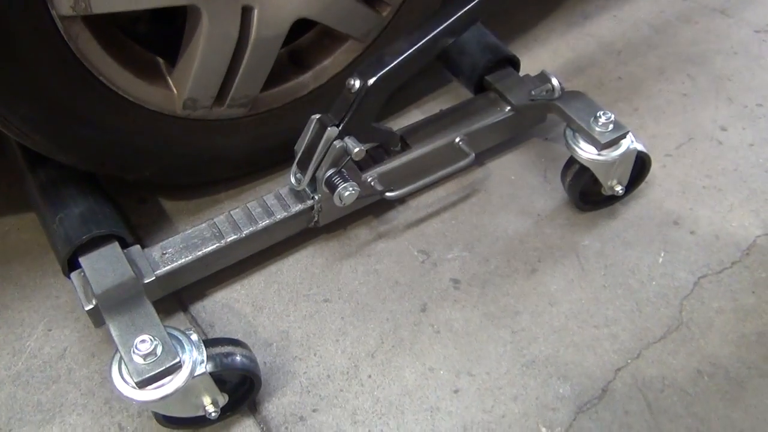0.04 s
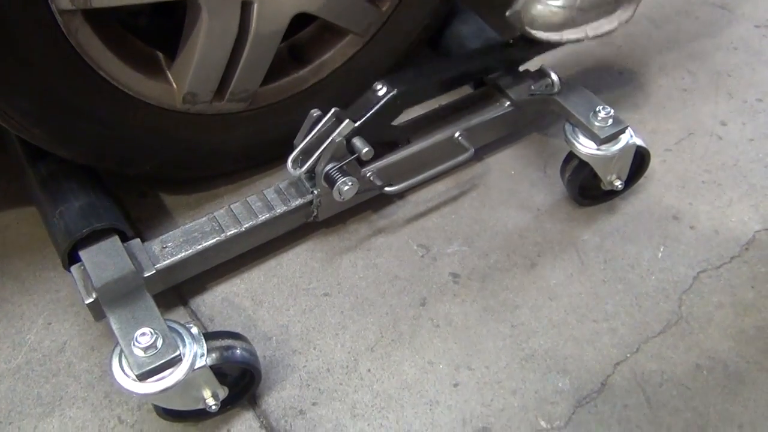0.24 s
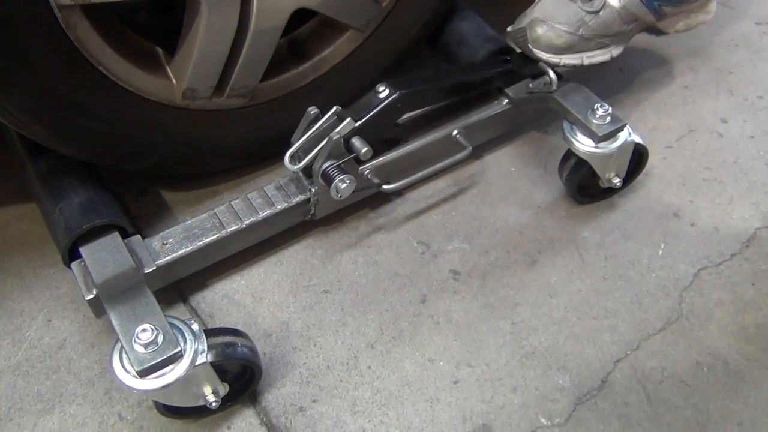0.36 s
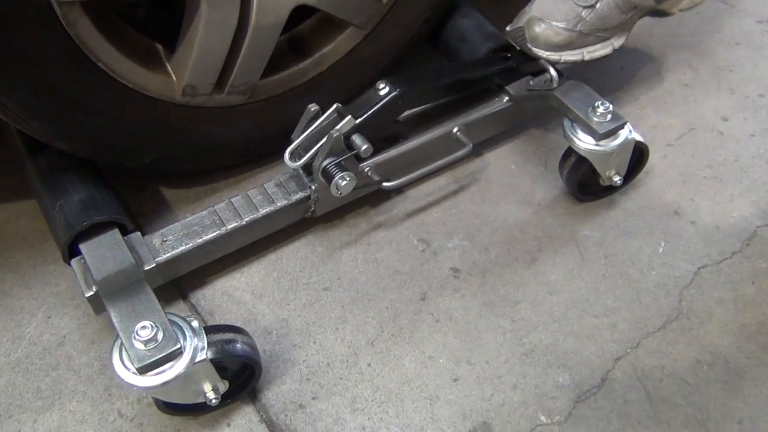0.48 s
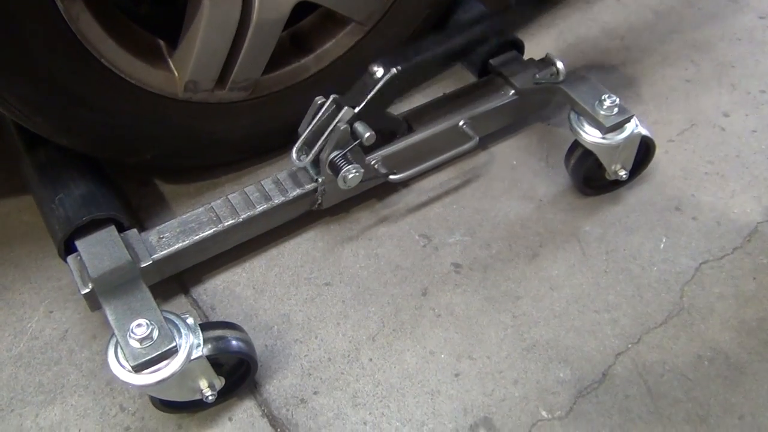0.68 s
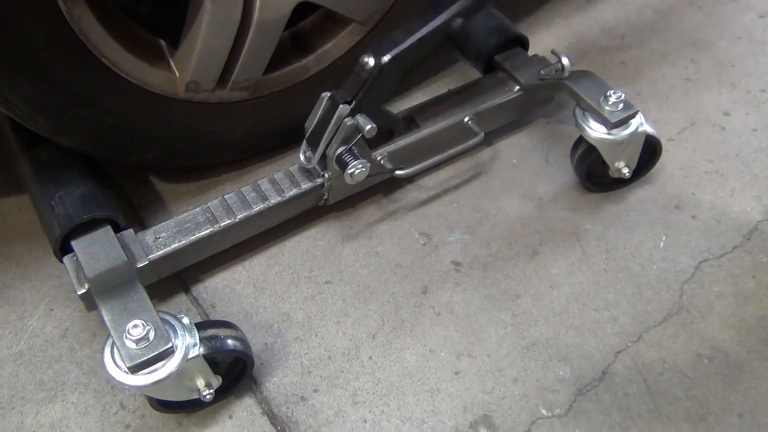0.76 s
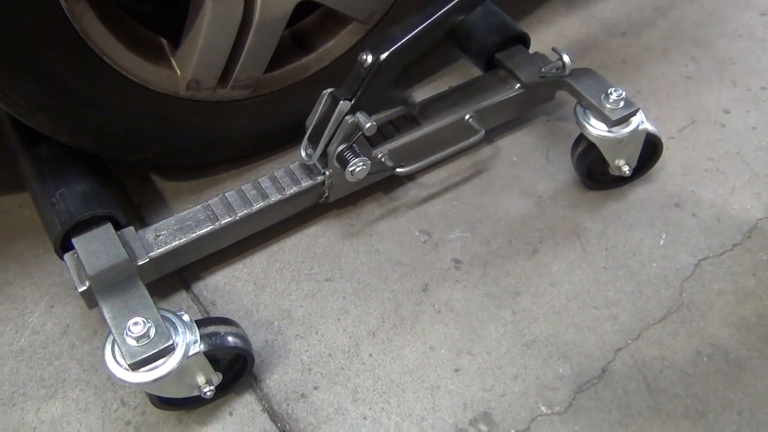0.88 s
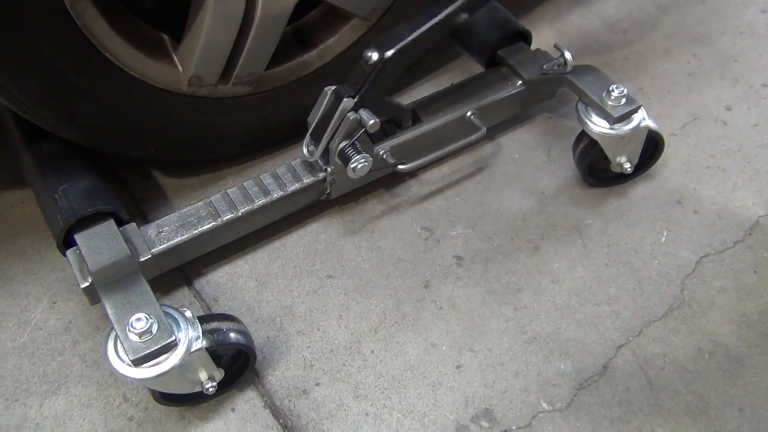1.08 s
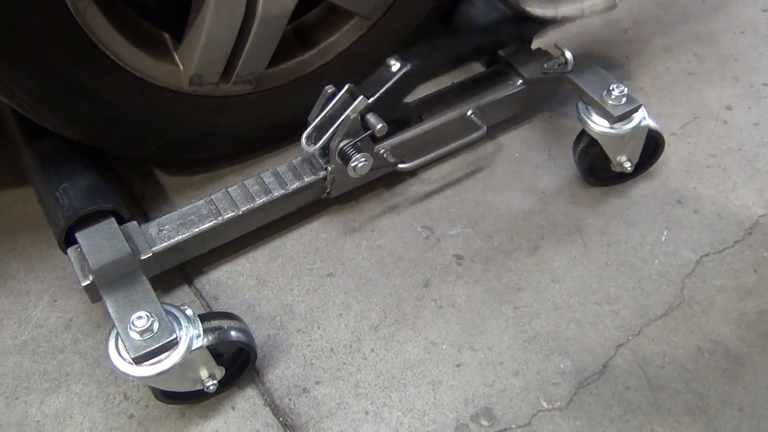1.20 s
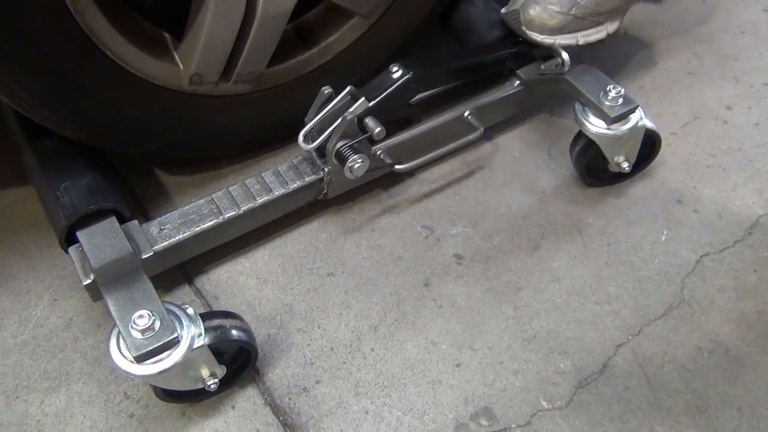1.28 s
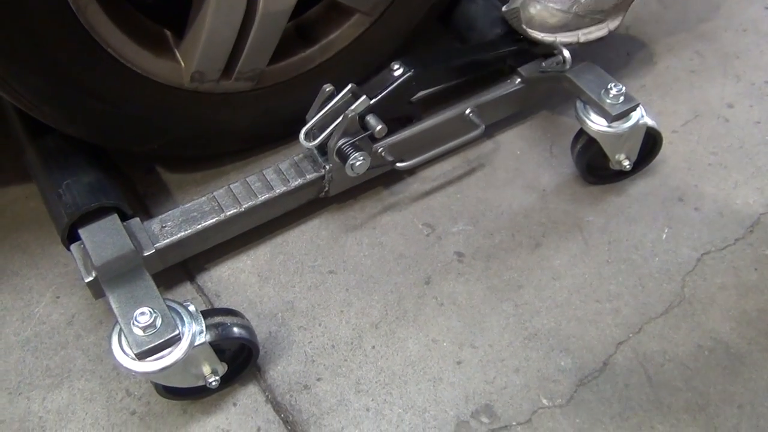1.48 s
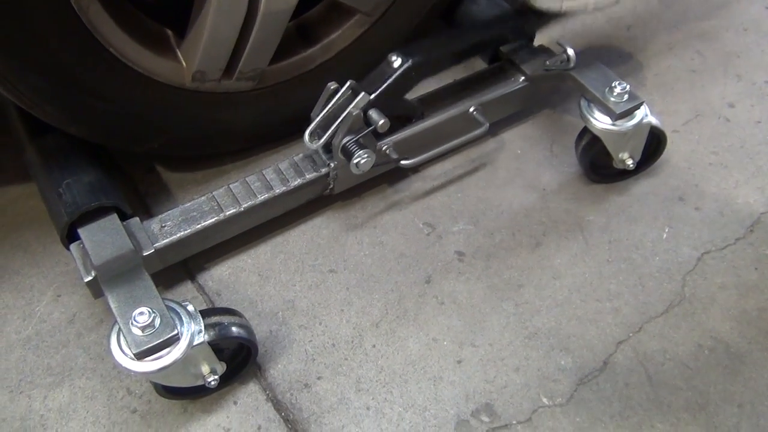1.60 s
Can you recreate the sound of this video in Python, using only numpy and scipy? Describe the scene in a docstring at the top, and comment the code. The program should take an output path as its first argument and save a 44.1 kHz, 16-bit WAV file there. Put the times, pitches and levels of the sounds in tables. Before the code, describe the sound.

A steel jack is pumped by foot, close by in a concrete garage. Soft, dull knocks lead into a bright, ringing pedal clank at about 0.3 seconds. From 0.7 to 1.0 seconds a quick, uneven run of ratchet clicks follows as the pedal springs back. More knocks bring a second clank around 1.25 seconds, then faint taps near 1.6. Each blow echoes briefly over low room noise.

```python
"""Dull knocks, bright steel clanks and a run of ratchet clicks ring out close by in a concrete garage.
A steel positioning jack is being pumped by foot: the shoe knocks on the pedal, the pedal clanks down,
and on its way back the pawl (a small catch) clicks over the toothed bar.
The garage rings after each blow, and a fast limiter holds the loudest ones down."""
import sys
import numpy as np
from scipy import signal
from scipy.fft import rfft, irfft
from scipy.io import wavfile
from scipy.ndimage import uniform_filter1d, minimum_filter1d

SR = 44100
rng = np.random.default_rng(int(sys.argv[2]) if len(sys.argv) > 2 else 0)


def store_pcm(level_fs):
    """Save levels as 16-bit WAV."""
    pcm = np.round(np.clip(level_fs, -1, 1) * 32767).astype(np.int16)
    wavfile.write(sys.argv[1], SR, np.atleast_2d(pcm).T)


N = 72765
LEAD_S = .2  # the jack starts this early, so it is already ringing at time 0
RISE_S = 0.001501  # build-up at 1 kHz; low bending waves in steel arrive later
THIRDS_HZ = 1000 * 2 ** (np.arange(-13, 13) / 3)  # band centres, a third of an octave apart


def amp(db):
    """Turns decibels into a gain."""
    return 10 ** (np.asarray(db) / 20)


def fade(t, t60):
    """A dying gain; t60, the fade time, is how long it takes to drop 60 dB."""
    return amp(-60 * t / t60)


def read(points, hz):
    """Looks up a table's value at hz, on a log-frequency axis."""
    f, value = np.transpose(points)
    return np.interp(np.log(hz + 1), np.log(f), value)


def unit(x):
    """Scales each row to energy 1."""
    return x / np.sqrt(np.sum(x ** 2, -1, keepdims=True) + 1e-30)


def add(mix, s, sound):
    """Mixes a sound in at time s; the mix starts LEAD_S early."""
    part = mix[max(round((s + LEAD_S) * SR), 0):][:len(sound)]
    part += sound[:len(part)]


def noise_bands(size):
    """White noise split into bands, one per row."""
    hz, band = np.fft.rfftfreq(size, 1 / SR), np.arange(len(THIRDS_HZ))
    place = np.interp(np.log(hz + 1), np.log(THIRDS_HZ), band)
    share = np.sqrt(np.maximum(1 - abs(place - band[:, None]), 0))
    return irfft(share * np.exp(2j * np.pi * rng.random(share.shape)), size)


def modes(table, wobble_hz=0, size=24000):
    """A part's natural tones (modes), one fading sine per row; a loose part wobbles in pitch."""
    hz, db, t60 = np.transpose(table)[:, :, None]
    t = np.arange(size) / SR
    wobble = np.cumsum(rng.standard_normal((len(hz), size)), 1) * np.sqrt(2 * np.pi * wobble_hz / SR)
    onset = 1 - np.exp(-t * (hz / 1000) / RISE_S)
    phase = 2 * np.pi * (hz * t + rng.random(hz.shape)) + wobble
    return np.sqrt(2) * amp(db) * onset * fade(t, t60) * np.sin(phase)


def background(level_db=-52):
    """Low, steady room noise."""
    # Tone of the noise: (frequency [Hz], level [dB])
    colour = [(25, -30.5), (60, -7.5), (130, -5), (280, -4.5), (420, -16), (650, -9.5), (1200, -18.5),
              (3000, -19.5), (8000, -27), (16000, -34.5)]
    hz = np.fft.rfftfreq(N, 1 / SR)
    noise = irfft(rfft(rng.standard_normal(N)) * amp(read(colour, hz)), N)
    return amp(level_db) * np.sqrt(N) * unit(noise)


def garage(x, build_s=0.002021, size=32768):
    """The room's echoes blur into a tail, each band dying at its own speed."""
    # How long the room rings, with no tail below 150 Hz: (frequency [Hz], fade time [s])
    fade_times = [(150, -0.013), (500, 0.6811), (1500, 0.5611), (4000, 0.6557), (8000, 0.6565),
                  (15000, 0.001)]
    # How strongly it rings: (frequency [Hz], level [dB])
    levels = [(100, 2.5), (400, -16), (1500, -10.5), (4000, -14.5), (8000, -19), (15000, -11)]
    t, bands = np.arange(size) / SR, noise_bands(size)
    tails = unit(bands * (1 - np.exp(-t / build_s)) * fade(t, read(fade_times, THIRDS_HZ)[:, None]))
    gains = amp(read(levels, THIRDS_HZ)) * np.linalg.norm(bands, axis=1)
    return signal.fftconvolve(x, gains @ tails)[:len(x)]


def clink(burst, ripple_db=4.5, spacing_hz=300, size=1024):
    """Each contact point has its own short resonances: random peaks in the treble."""
    hz, knots = abs(np.fft.fftfreq(size, 1 / SR)), np.arange(0, SR / 2, spacing_hz)
    depth = np.clip(hz / 1000 - 1, 0, 1)  # none below 1 kHz, full from 2 kHz
    ripple = np.clip(rng.standard_normal(len(knots)), -2, 2)
    gain = amp(ripple_db * depth * np.interp(hz, knots, ripple))
    log_gain = np.log(gain) - depth * np.log(np.mean(gain ** 2)) / 2
    taps = np.fft.ifft(np.exp(np.conj(signal.hilbert(log_gain)))).real  # rings only after the hit
    return signal.fftconvolve(burst, taps)[:len(burst)]


def blow(levels_db, t60, size=6000):
    """A hit on steel: a noise burst that dies fast, treble first, plus the frame's short tones."""
    # Centres of the bass, middle, treble and top levels [Hz]
    centres_hz = [500, 1600, 4200, 10000]
    # Tone shared by all bursts: (frequency [Hz], level [dB])
    colour = [(40, -41), (130, -35.5), (260, -4), (370, -12.5), (560, 2), (800, -5), (1300, -6), (2300, 0),
              (7500, 0), (11000, -4), (14000, -5), (17500, -24)]
    # Tones of the frame: (pitch [Hz], level [dB], fade time [s])
    frame = [(133.15, -4.5, 0.07942), (282.67, -5.5, 0.09138), (421.11, -5.5, 0.03941),
             (583.06, -2.5, 0.07996), (843.7, -7.5, 0.07181), (1183.3, -0.5, 0.04261),
             (1712.6, -10, 0.04384), (2223, -35.5, 0.014), (3171.1, 1, 0.03065), (5095.4, -3, 0.03109)]
    t, khz = np.arange(size) / SR, THIRDS_HZ[:, None] / 1000
    onset = (1 - np.exp(-t * khz / RISE_S)) ** 2
    decay = fade(t, t60 * (khz / 2) ** -0.1776)  # t60 holds at 2 kHz; lower bands last longer
    bands = unit(noise_bands(size) * onset * decay) * np.sqrt(.005 * SR)
    force = list(zip(centres_hz, levels_db))
    burst = amp(read(force, THIRDS_HZ) + read(colour, THIRDS_HZ)) @ bands
    return clink(burst) + amp(read(force, np.array(frame)[:, 0])) @ modes(frame, size=size)


def ringing(table, wobble_hz, favoured_hz, size=16384):
    """A struck steel part: clear tones over a shimmer; where it is hit decides which are strongest."""
    # The many weak tones between the clear ones: (frequency [Hz], level [dB])
    weak_tones = [(200, -45.5), (900, -19), (1800, -25), (3000, -4), (4000, -10), (7000, -4), (10000, -19),
                  (16000, -15)]
    t = np.arange(size) / SR
    octaves_away = abs(np.log2(np.array(table)[:, 0] / favoured_hz))
    favour_db = 8 * np.exp(-(octaves_away / .06) ** 2) - 6 * np.minimum(octaves_away, 1)
    shimmer = amp(read(weak_tones, THIRDS_HZ)) @ unit(noise_bands(size)) * np.sqrt(size)
    shimmer *= (1 - np.exp(-t / 0.001917)) * fade(t, t60=0.32253)
    return amp(favour_db) @ modes(table, wobble_hz, size) + shimmer


def knocks(mix):
    """The shoe and the linkage knock dully, each time with a hollow ring."""
    # Knocks: (time [s], bass [dB], middle [dB], treble [dB], top [dB], fade time [s],
    # ring level [dB], ring pitch [Hz])
    hits = [(0.101, -44, -50, -78.5, -81, 0.0632, -38.5, 910.5),
            (0.1509, -46, -27.5, -40, -51, 0.03237, -31.5, 1180),
            (.163, -48, -52.5, -40.5, -38.5, 0.07042, -46.5, 4940),
            (.302, -23.5, -26, -34.5, -26.5, .023, -7, 585.2),
            (1.0748, -36.5, -54, -80.5, -75.5, 0.02608, -36, 853.7),
            (1.083, -53.5, -52, -82, -80, 0.0179, -31.5, 649),
            (1.1209, -48.5, -30, -44.5, -60, 0.04023, -27, 1205),
            (1.1342, -51, -42, -35.5, -47, 0.0495, -32.5, 2783),
            (1.2784, -28, -28, -36.5, -26.5, 0.02513, -28.5, 619.3),
            (1.2858, -30, -55.5, -52, -51, 0.02844, -22.5, 551.9),
            (1.568, -45, -52.5, -54.5, -52.5, 0.0567, -37, 1113),
            (1.577, -46.5, -48.5, -54.5, -47.5, 0.07645, -39.5, 1420),
            (1.622, -44, -47, -55.5, -46.5, 0.0844, -32.5, 1037)]
    # Tones of the hollow ring: (pitch [times the ring pitch], level [dB], fade time [s])
    hollow = [(1, 3, 0.03449), (0.901, -7, 0.034245), (.76, -3.5, 0.043025)]
    for s, *levels_db, t60, ring_db, ring_hz in hits:
        add(mix, s, blow(levels_db, t60))
        add(mix, s, amp(ring_db) * modes(np.array(hollow) * [ring_hz, 1, 1]).sum(0))


def load_thumps(mix):
    """The load thuds onto the floor, the pawl catches it and the jack's body booms."""
    # The load shifts onto the floor: (time [s], level [dB])
    thuds = [(.244, -37.5), (.404, -43.5), (.969, -44)]
    # The pawl catches a tooth: (time [s], level [dB])
    catches = [(.244, -46), (.787, -30), (1.2162, -20)]
    # The jack's body booms after a heavy blow: (time [s], level [dB])
    booms = [(.303, -45), (.79, -45), (1.281, -45)]
    # Tones of the loaded bar, the body and the thud: (pitch [Hz], level [dB], fade time [s])
    loaded_bar = [(274.48, -1.5, 0.07162), (519.48, -1, 0.06511), (830.36, 1, 0.04616),
                  (1186.1, -2.5, 0.03421), (1591.9, 0.5, 0.05082), (1739.8, 1.5, 0.04675),
                  (2143.5, 1, 0.03666), (3060.8, 3, 0.04428), (3893.5, 3, 0.03476)]
    body = [(266.15, -6.5, 0.3858), (314.66, -3, 0.436), (421.02, -1.5, 0.2216), (585.56, -2.5, 0.2359)]
    thud_tone = [(55, 0, .16)]
    for hits, tones in ((thuds, thud_tone), (catches, loaded_bar), (booms, body)):
        for s, db in hits:
            add(mix, s, amp(db) * modes(tones).sum(0))


def scrapes(mix, slips_per_s=900, scatter_db=4, size=4096):
    """The pawl scrapes over the back of a tooth in a quick run of tiny, uneven slips."""
    # Scrapes: (time [s], length [s], level [dB])
    runs = [(.805, .036, -30.5), (0.926, .01, -23), (.936, 0.022, -31.5), (1.2506, .007, -35)]
    # Force of one slip: (bass [dB], middle [dB], treble [dB], top [dB])
    slip_db = [-28, -9, -2, 0]
    for s, length, db in runs:
        at = np.cumsum(rng.uniform(0, 2, size)) / slips_per_s
        force = amp(scatter_db * rng.standard_normal(size))
        slips = np.bincount((at[at < length] * SR).astype(int), force[at < length], size)
        scrape = signal.fftconvolve(slips, blow(slip_db, t60=.005, size=1024))
        add(mix, s, amp(db) * unit(scrape) * np.sqrt(length * SR))


def strike(mix, t, hits, tones, wobble_hz, choke_db=-1.5, choke_s=0.001846):
    """Adds blows to the mix and returns the part's ring; each contact chokes the earlier ringing a bit."""
    ring = np.zeros(len(t))
    for s, *levels_db, t60, ring_db, favoured_hz in hits:
        add(mix, s, blow(levels_db, t60))
        ring *= amp(choke_db * np.clip((t - s) / choke_s, 0, 1))
        add(ring, s, amp(ring_db) * ringing(tones, wobble_hz, favoured_hz))
    return ring


def pedal_clanks(mix, t):
    """The loose pedal lever clanks and rings as it is pressed down."""
    # Clanks: (time [s], bass [dB], middle [dB], treble [dB], top [dB], fade time [s],
    # ring level [dB], favoured pitch [Hz])
    clanks = [(-.13, -34, -20.5, -16, -12, 0.016165, -35, 8010),
              (.244, -60, -16, -22, -35, .027, -46, 2640),
              (.248, -30.5, -39, -28, -21, 0.01652, -36.5, 12230),
              (.278, -50, -40, -27, -20, 0.0406, -30.5, 2756),
              (.2912, -54, -18, -18.5, -14, 0.04826, -26, 7787),
              (.318, -38, -38, -42, -31, 0.02127, -33, 5150),
              (.344, -44, -41.5, -41, -34, 0.1079, -38.5, 12600),
              (1.2158, -33.5, -19.5, -19.5, -18.5, 0.03674, -56.5, 3191),
              (1.251, -45.5, -46.5, -26.5, -15.5, 0.0324, -33.5, 8047),
              (1.2555, -69.5, -25.5, -18.5, -14.5, 0.01628, -32.5, 1679),
              (1.2648, -77.5, -20, -32.5, -21, 0.03629, -34.5, 6530),
              (1.293, -50, -33.5, -40, -42.5, 0.02292, -31.5, 8431),
              (1.322, -44, -70.5, -43, -58, 0.1411, -37, 5150)]
    # Tones of the lever: (pitch [Hz], level [dB], fade time [s])
    lever = [(1554.2, -11, 0.2665), (1732.9, -9, 0.254), (2651.3, -10.5, 0.2186), (2804.4, -4.5, 0.2354),
             (2889.4, -1, 0.2204), (2951.9, -2.5, 0.334), (3277.6, -5, 0.4304), (5129.8, -6.5, 0.2361),
             (6530, -6.5, 0.1613), (7767.6, -13.5, 0.2565), (7996.3, -7, 0.2701), (8263.4, -5.5, 0.3921),
             (12332, -5, 0.2371)]
    ring = strike(mix, t, clanks, lever, wobble_hz=33.8)
    mix += ring


def ratchet_clicks(mix, t, rest_s=1.0248):
    """The pawl clicks over the teeth as the pedal springs back; coming to rest, it stills the bar."""
    # Clicks: (time [s], bass [dB], middle [dB], treble [dB], top [dB], fade time [s],
    # ring level [dB], favoured pitch [Hz])
    clicks = [(.704, -62, -42.5, -46.5, -31, 0.1233, -65, 7400),
              (.711, -71, -40, -39.5, -34, 0.0153, -47.5, 3064),
              (.741, -66.5, -37.5, -32.5, -34, 0.015, -44, 3000),
              (.758, -75.5, -28.5, -22.5, -23, 0.02997, -46, 2985),
              (.786, -28.5, -24, -30, -27.5, 0.0276, -70, 3000),
              (.7985, -47, -27, -32.5, -19, 0.005746, -67, 12200),
              (.8025, -64.5, -32.5, -24.5, -11, 0.01401, -26, 7817),
              (.8425, -51, -37, -29, -40.5, 0.008204, -32.5, 8354),
              (.879, -48, -27, -19.5, -14.5, 0.01722, -36.5, 5845),
              (.8857, -52, -38, -27, -17, 0.01783, -28.5, 13500),
              (.918, -66, -32, -29, -26.5, 0.0348, -33.5, 3085),
              (.9255, -45.5, -25.5, -28, -21.5, 0.0419, -45.5, 2866),
              (.9332, -65.5, -33.5, -30, -18, 0.01295, -29.5, 1127),
              (.9565, -66, -43.5, -45, -42.5, 0.018, -31.5, 3059),
              (.9725, -56.5, -27, -37, -18, 0.00994, -33, 5102),
              (.9992, -66, -29.5, -32, -21, 0.02255, -35.5, 8633),
              (1.018, -52.5, -32.5, -33, -37, 0.05093, -38, 8191)]
    # Tones of the pawl and toothed bar: (pitch [Hz], level [dB], fade time [s])
    bar = [(537.07, -4.5, 0.4572), (1155.3, -10, 0.2745), (3004, -3, 0.3237), (3034.5, -7.5, 0.1914),
           (3715.7, -12, 0.299), (4970.2, 0, 0.3322), (5137, -4, 0.3067), (5841, -9, 0.294),
           (7994.2, -7, 0.2516), (8384.8, -7, 0.2935), (9673, -11.5, 0.2078), (12110, -10.5, 0.2024),
           (13425, -4.5, 0.2286), (15448, -8.5, 0.2195)]
    ring = strike(mix, t, clicks, bar, wobble_hz=5.097)
    mix += ring * fade(np.maximum(t - rest_s, 0), t60=.11)


def spread(x, tilt_db=0.1185, fade_s=0.0065063, size=2048):
    """Two close microphones hear nearly the same, with small differences from early reflections."""
    # Stereo width: (frequency [Hz], side level against the middle [dB])
    width = [(60, -19), (130, -7.5), (300, -22.5), (1500, -25.5), (3000, -24), (5500, -15), (8000, -13),
             (10500, -18), (13000, -38)]
    t, hz = np.arange(size) / SR, np.fft.rfftfreq(N, 1 / SR)
    reflections = rfft(rng.standard_normal(size) * np.exp(-t / fade_s), N)
    side = irfft(rfft(x) * np.exp(1j * np.angle(reflections)) * amp(read(width, hz)), N)
    return np.array([(x + side) * amp(tilt_db), (x - side) * amp(-tilt_db)])


def scene():
    """The jack, the garage's ring and the room noise, in stereo."""
    t = np.arange(N + round(LEAD_S * SR)) / SR - LEAD_S
    jack = np.zeros(len(t))
    knocks(jack)
    load_thumps(jack)
    scrapes(jack)
    pedal_clanks(jack, t)
    ratchet_clicks(jack, t)
    return spread((jack + garage(jack))[-N:] + background())


def record(dry):
    """A fast limiter turns loud blows down just ahead of time; peaks are rounded, the very top is cut."""
    limit_db, share, release_db_per_s = -20, 0.74543, 925
    ahead, ceiling = round(0.0013384 * SR), .5
    power_db = 10 * np.log10(abs(uniform_filter1d((dry ** 2).mean(0), size=64)) + 1e-12)
    fall = np.arange(N) * release_db_per_s / SR
    held_db = np.maximum.accumulate(power_db + fall) - fall  # jumps up, then sinks steadily
    gain_db = -share * np.maximum(held_db - limit_db, 0)
    limited = dry * amp(uniform_filter1d(minimum_filter1d(gain_db, ahead), ahead))
    rounded = limited / (1 + (limited / ceiling) ** 6) ** (1 / 6)
    low_pass = signal.firwin(511, cutoff=18000, window=("kaiser", 9), fs=SR)
    return signal.oaconvolve(rounded, low_pass[None], "same")


dry = scene()
out = record(dry)
store_pcm(out)
```